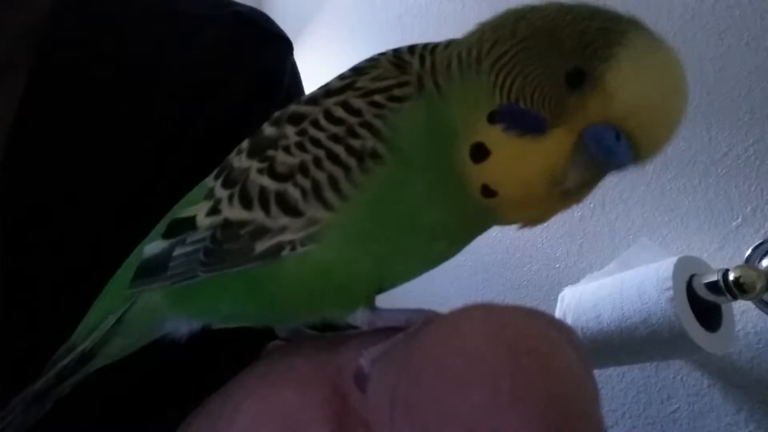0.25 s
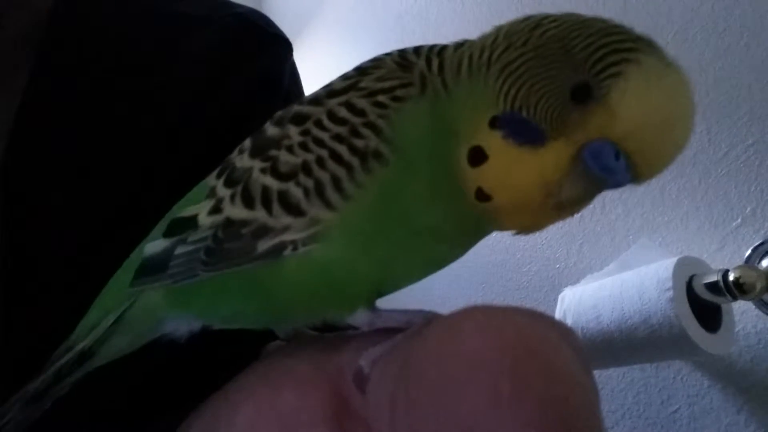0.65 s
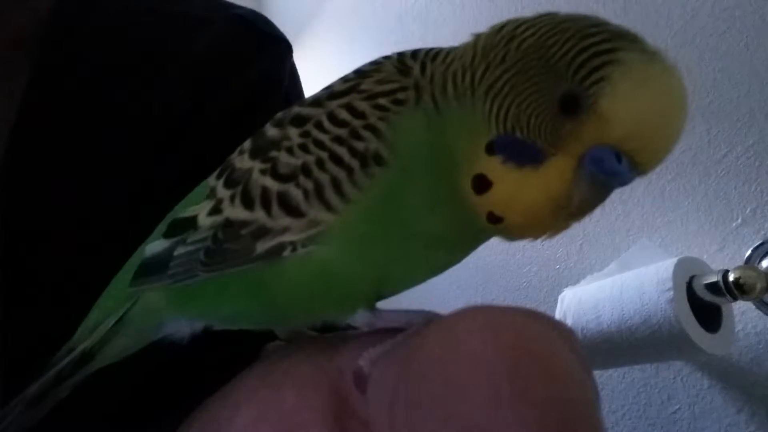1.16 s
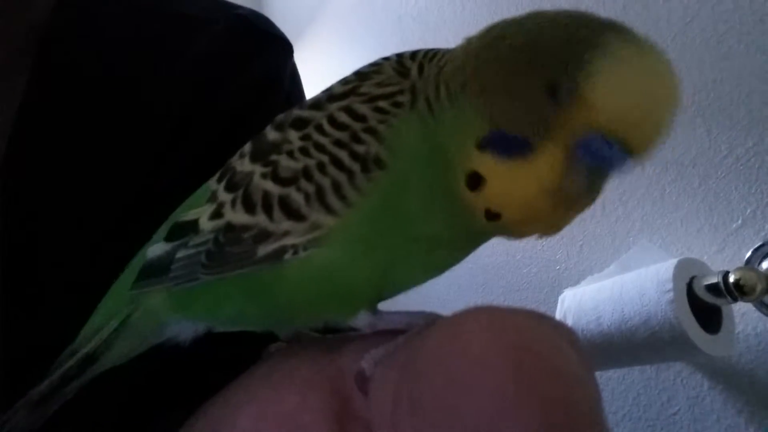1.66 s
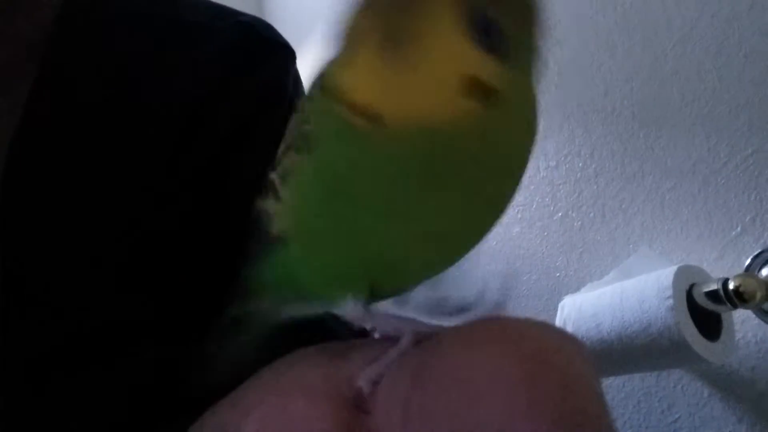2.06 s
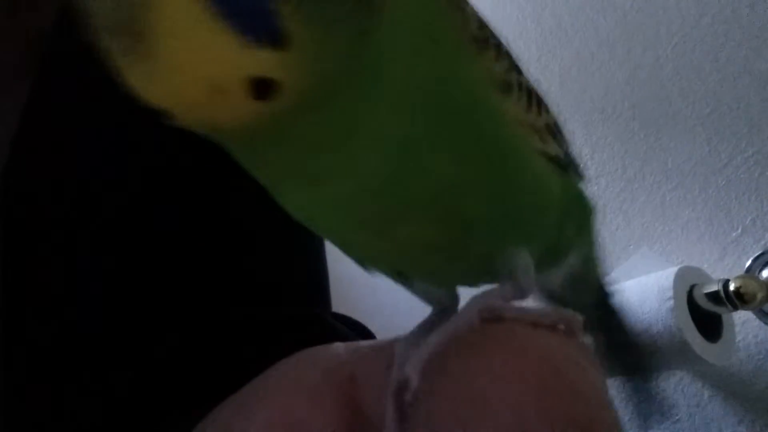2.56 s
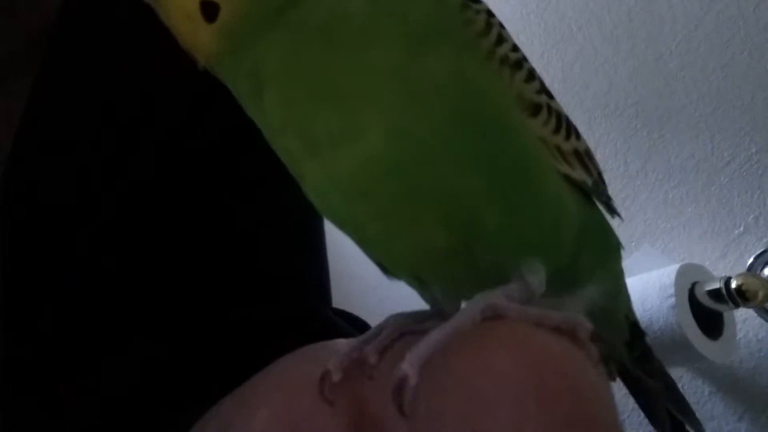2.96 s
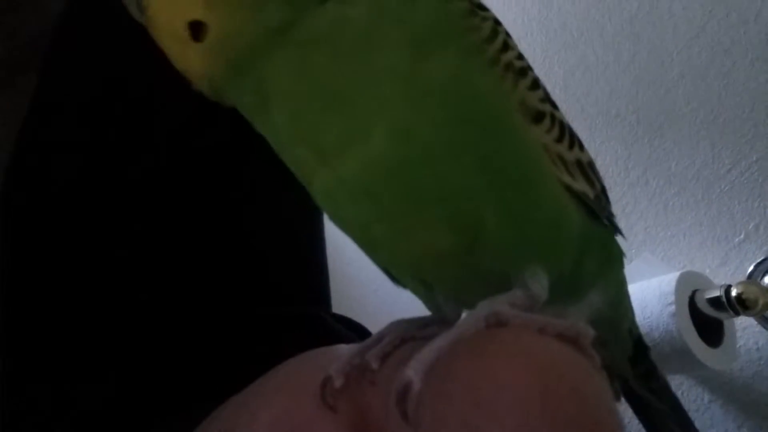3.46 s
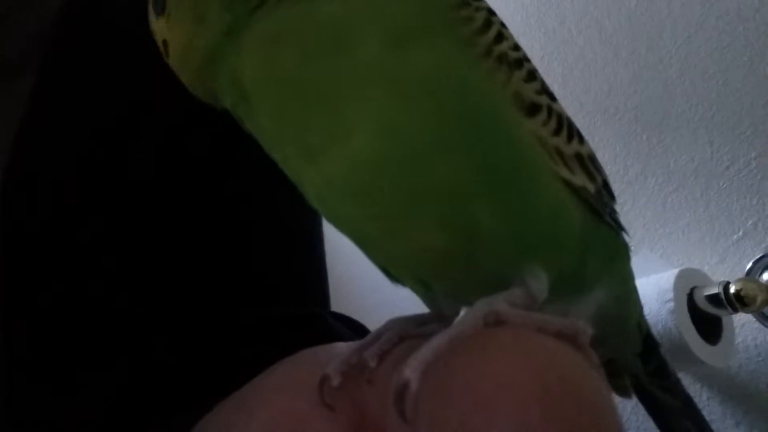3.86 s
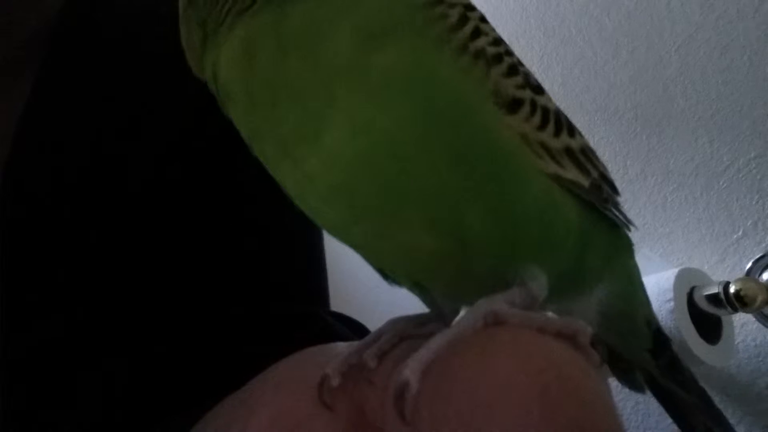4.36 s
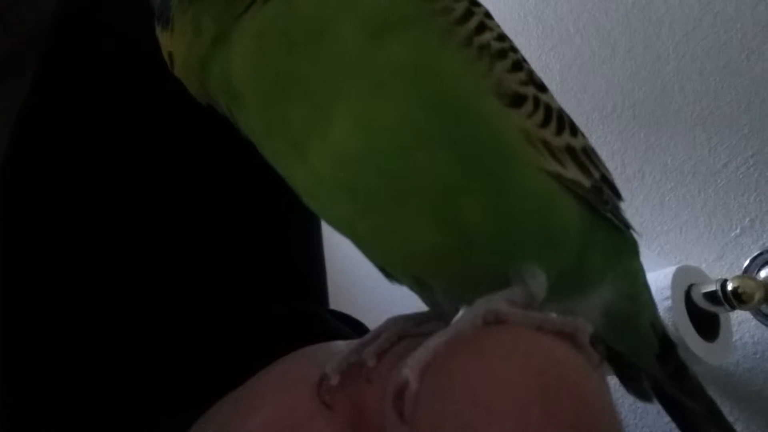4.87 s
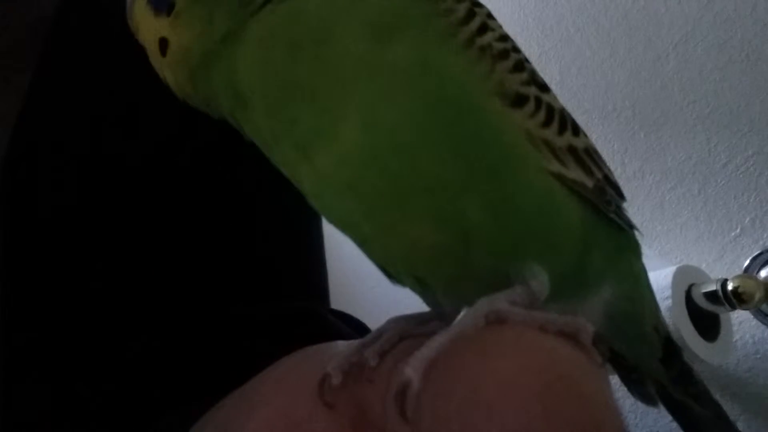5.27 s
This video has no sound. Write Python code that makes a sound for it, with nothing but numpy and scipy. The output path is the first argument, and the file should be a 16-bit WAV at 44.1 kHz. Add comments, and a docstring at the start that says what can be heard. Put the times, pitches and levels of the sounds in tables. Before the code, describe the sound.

A budgerigar very close to the microphone in a small hard-walled room with a steady fan. It starts with faint crackles, beak clicks and throaty clucks, pauses, chirps briefly, then lets out one harsh loud squawk ending in a hard snap. The fan dips and swells back. Later come a sharp click, whistles, a beak rattle and a final hurried warble.

```python
"""A budgerigar chatters on a hand close to the microphone in a small room where a fan runs.
It clucks, crackles, gives one harsh squawk and then warbles in quick runs of gliding whistles.
Slaps and breath noise ring in throat and beak resonances; the whistles are sines with overtones.
The fan is coloured noise with wavering tones. The squawk drives an automatic gain control down,
and the fan swells back afterwards."""
import sys
import numpy as np
from scipy import signal
from scipy.fft import rfft, irfft
from scipy.io import wavfile
from scipy.ndimage import uniform_filter1d, minimum_filter1d

SR = 44100
rng = np.random.default_rng(int(sys.argv[2]) if len(sys.argv) > 2 else 0)


def materialize(psi):
    """Save the field psi as 16-bit PCM at rate SR to the path in sys.argv[1].

    A 1-D psi becomes a single channel; in a 2-D psi each row is a channel.
    """
    bounded = np.clip(np.atleast_2d(psi).T, -1, 1)
    quanta = np.round(bounded * 32767).astype(np.int16)
    wavfile.write(sys.argv[1], SR, quanta)


N = 242991
TIME = np.arange(N) / SR

# All table levels are relative: the mix and the settings beside a table shift them.
# resonances of the throat in the squawk: centre_hz, width_hz, level_db
SQUAWK_THROAT = [(2050, 1100, -1.5), (4470, 700, 2), (5300, 550, 0.5), (6500, 1800, -4.5),
                 (9000, 2200, -10), (13820, 770, -15)]
# resonances of throat and open beak: centre_hz, width_hz, level_db
OPEN_BEAK = [(1670, 660, 3.5), (4430, 2200, 0.5), (5900, 1500, 0), (7900, 610, -3), (10000, 1540, -7),
             (13800, 830, -14)]


def from_db(db):
    """Level to amplitude: 20 dB is a factor of ten."""
    return 10 ** (np.asarray(db) / 20)


def rms_one(x):
    """Normalise to unit mean-square power."""
    return x / np.sqrt(np.mean(x ** 2) + 1e-20)


def at_hz(points, hz):
    """Interpolate a spectrum linearly on a logarithmic frequency axis."""
    known_hz, values = np.transpose(points)
    return np.interp(np.log(np.maximum(hz, 1)), np.log(known_hz), values)


def colour(x, points):
    """Zero-phase filtering: multiply the spectrum by a gain curve in dB."""
    size = x.shape[-1]
    gain = from_db(at_hz(points, np.fft.rfftfreq(size, 1 / SR)))
    return irfft(rfft(x) * gain, size)


def drift(rate_hz):
    """Low-passed noise of unit spread: a random fluctuation up to about the given rate."""
    hz = np.fft.rfftfreq(N, 1 / SR)
    return rms_one(irfft(rfft(rng.standard_normal(N)) / (1 + (hz / rate_hz) ** 4), N))


def resonate(x, modes, low_cut_hz):
    """Parallel resonances of alternating sign; a small throat radiates no bass."""
    out = 0
    for k, (hz, width, db) in enumerate(modes):
        radius = np.exp(-np.pi * width / SR)
        poles = [1, -2 * radius * np.cos(2 * np.pi * hz / SR), radius * radius]
        zeros = np.array([1, 0, -1]) * (1 - radius * radius) / 2
        out = out + (-1) ** k * from_db(db) * signal.lfilter(zeros, poles, x)
    return signal.sosfilt(signal.butter(2, low_cut_hz, "high", fs=SR, output="sos"), out)


def notch(x, hz, width_hz):
    """An antiresonance of the beak cavity removes a narrow band."""
    return signal.lfilter(*signal.iirnotch(hz, hz / width_hz, SR), x)


def gate(start, end, edge_s):
    """Amplitude envelope of one syllable: its samples and a raised-cosine rise and fall."""
    span = np.flatnonzero((TIME > start - edge_s) & (TIME < end + edge_s))
    inside = np.minimum(TIME[span] - start, end - TIME[span])
    return span, np.sin(np.pi / 4 * np.clip(1 + inside / edge_s, 0, 2)) ** 2


def slaps(rate_hz, jitter, spread_db, air):
    """Pulse excitation: uneven slaps of the syrinx membranes with added breath noise."""
    cycles = np.cumsum(rate_hz * np.exp(jitter * drift(rate_hz))) / SR
    strength = from_db(spread_db * np.clip(rng.standard_normal(N), -2, 2))
    pulses = np.diff(np.floor(cycles), prepend=0) * strength
    return rms_one(pulses) + air * rng.standard_normal(N)


def syllables(voice, rows, edge_s):
    """Amplitude gating lets a voice out in short bursts, each at its own level."""
    out = np.zeros(N)
    for start, end, db in rows:
        span, envelope = gate(start, end, edge_s)
        burst = rms_one(voice[span] * envelope)
        out[span] += from_db(db) * burst * np.sqrt(np.mean(envelope ** 2))
    return out


def repeats(start, end, gap_s, db, spread_db, jitter=0.11):
    """A jittered periodic series of strokes: rows of start_s, level_db."""
    times = np.arange(start, end, gap_s)
    late, loud = rng.standard_normal((32, 2))[:len(times)].T
    return [(s + jitter * gap_s * a, db + spread_db * b) for s, a, b in zip(times, late, loud)]


def fan(rush_db=-35.0, tones_db=-1.5, waver_hz_at_500=3.86, waver_db=2.0):
    """Broadband turbulence, partly coherent between channels, with wavering motor and duct tones."""
    # spectrum of the rush: pitch_hz, level_db (per Hz)
    rush_colour = [(18, -35), (30, -8), (71, -15.5), (125, -8), (162, -18.5), (363, -8.5), (402, -11.5),
                   (446, 0), (482, -4.5), (770, -6), (854, -10.5), (1200, -7), (3380, -26.5),
                   (11200, -32.5), (14800, -59.5)]
    # tones of motor and ducts: pitch_hz, level_db
    tone_rows = [(43.1, -51), (118.4, -53), (371.4, -47), (446.8, -43), (549.1, -45), (646.0, -45.5),
                 (759.0, -46.5), (893.6, -55), (995.9, -47.5), (1184, -48.5)]
    # correlation of the two channels: pitch_hz, likeness (-1 to 1)
    likeness = [(60, 1), (300, 0.81), (700, 0.84), (1500, -0.36), (3000, 0), (12000, 0)]
    # right channel over left: pitch_hz, level_db
    lean = [(600, 0), (1400, 5), (2500, 6), (5000, 1), (9000, 0.5)]
    alike = np.clip(at_hz(likeness, np.fft.rfftfreq(N, 1 / SR)), -1, 1)
    mid, side = rfft(rng.standard_normal((2, N)))
    stereo = mid * np.sqrt(1 + alike) + side * np.sqrt(1 - alike) * [[1], [-1]]
    air = colour(irfft(stereo, N), rush_colour)
    air *= from_db(rush_db) / np.std(air.mean(axis=0))
    tones = 0
    for hz, db in tone_rows:
        # the pitch waver grows in proportion to the pitch
        phase = 2 * np.pi * np.cumsum(hz + waver_hz_at_500 * hz / 500 * drift(11.83)) / SR
        tone = np.sin(phase) * from_db(waver_db * drift(4.1))
        tones = tones + from_db(db + tones_db) * rms_one(tone)
    left, right = air + tones
    left = colour(left, [(hz, -db / 2) for hz, db in lean])
    right = colour(right, [(hz, db / 2) for hz, db in lean])
    return np.array([left, right])


def room(x, t60_s=0.35, wet_db=-10.5, first_s=0.0017, left_db=-3.0, early=1.0, early_s=.015,
         wall_hz=4500, treble_s=0.14):
    """Exponentially decaying reverberation from close walls, independent in each channel."""
    # spectrum of the reply: pitch_hz, level_db
    reply_colour = [(500, -4.5), (2500, 1), (5000, 0.5), (9000, 6), (15000, -6)]
    age = TIME[:SR * 3 // 4]
    tail = colour(rng.standard_normal((2, len(age))), reply_colour)
    tail = tail * from_db(-60 * age / t60_s) * (age > first_s)
    dull = signal.sosfilt(signal.butter(1, wall_hz, fs=SR, output="sos"), tail)
    tail = dull + (tail - dull) * np.exp(-age / treble_s)   # every bounce takes away treble
    tail *= 1 + early * np.exp(-age / early_s)   # the nearest walls answer first and loudest
    tail /= np.sqrt(np.sum(tail ** 2, axis=1, keepdims=True))
    reply = signal.fftconvolve(x[None], tail, axes=1)[:, :N]
    return reply * from_db([[wet_db + left_db], [wet_db]])


def steps(thump_hz=110, decay_s=0.0014):
    """Heavily damped oscillations: soft thumps through the hand as the bird shifts its feet."""
    # start_s, level_db (before damping)
    thumps = [(2.804, -7), (2.854, -15), (2.936, -7)]
    out = np.zeros(N)
    for s, db in thumps:
        age = np.maximum(TIME - s, 0)
        decay = np.exp(-np.minimum(age / decay_s, 50))
        out += from_db(db) * np.sin(2 * np.pi * thump_hz * age) * decay
    return out


def crackles(trail_s=0.046, trail_db=-16):
    """Filtered slaps and hiss: a burst through the open beak, then a faint trail."""
    # dry crackles: start_s, length_s, level_db
    crackle_rows = [(0.024, 0.0041, -19.5), (0.327, .019, -38), (0.363, 0.0086, -25.5),
                    (4.512, 0.0124, -21.5), (4.685, 0.041, -28)]
    voice = resonate(slaps(330, jitter=0.48, spread_db=-6, air=1.0), OPEN_BEAK, low_cut_hz=530)
    bursts = [(start, start + length, db) for start, length, db in crackle_rows]
    trails = [(end, end + trail_s, db + trail_db) for _, end, db in bursts]
    return syllables(notch(voice, hz=3100, width_hz=120), bursts + trails, edge_s=0.00087)


def clicks(scrape=0.17, scrape_s=0.0022, rattle_spread_db=3):
    """Impulse response: a snap with a very short scrape rings in the open beak."""
    # single clicks of the beak, the last one ending the rattle: start_s, peak_db
    single = [(0.026, -22), (0.357, -30), (0.7607, -23.5), (3.2047, -10.5), (3.8266, -40), (4.6127, -9.5)]
    # rattles of the beak, quick and then slower: start_s, end_s, gap_s, peak_db
    rattles = [(4.5377, 4.58, .0076, -13), (4.589, 4.606, 0.0097, -13)]
    out, age = np.zeros(N), TIME[:SR // 100]
    rattling = [click for rattle in rattles for click in repeats(*rattle, rattle_spread_db)]
    for s, db in single + rattling:
        impulse = (age == 0) + scrape * rng.standard_normal(len(age)) * np.exp(-age / scrape_s)
        rung = notch(resonate(impulse, OPEN_BEAK, low_cut_hz=340), hz=3000, width_hz=1100)
        at = round(s * SR)
        out[at:at + len(age)] += from_db(db) * rung / np.abs(rung).max()
    return out


def mutters(gap_s=.0095, length_s=0.0058, centre_hz=2720, spread_db=2.5):
    """Soft muttering as a pulse train of tiny clucks: rows start_s, length_s, level_db, centre_hz."""
    # spells of muttering: start_s, end_s, level_db
    spells = [(0.044, 0.073, -31), (0.349, 0.394, -27.5), (0.506, 0.588, -29), (0.623, 0.641, -22.5),
              (1.7, 1.757, -26.5)]
    return [(s, length_s, db, centre_hz) for start, end, level in spells
            for s, db in repeats(start, end, gap_s, level, spread_db)]


def clucks(rest_hz=3000, fade_db=10.5, crack_db=-1.0, crack_s=0.0013, edge_s=.0009):
    """Source and filter: quick slaps ring in the nearly closed throat, tuned anew for each row."""
    # clucks, with a small tick at 0.763 s and a low knock at 3.204 s:
    # start_s, length_s, level_db, centre_hz
    cluck_rows = [(0.357, 0.0026, -18, 2720), (0.5163, 0.0062, -15, 3000), (0.57, 0.0062, -27, 2250),
                  (0.5963, .025, -13.5, 3220), (0.763, 0.0025, -23, 3250), (0.97, 0.0087, -11, 3100),
                  (1.175, 0.011, -24, 3240), (1.18, 0.011, -18, 3020), (1.719, 0.007, -22, 3100),
                  (3.204, 0.003, -26, 1860)]
    # throat resonances when tuned to rest_hz: centre_hz, width_hz, level_db
    rest_throat = [(2750, 1150, 8), (3500, 1560, 2.5), (7860, 1900, -21), (9500, 330, -12),
                   (13800, 1000, -44)]
    out, source = np.zeros(N), slaps(750, jitter=.3, spread_db=0.0, air=0.78)
    open_voice = rms_one(resonate(rng.standard_normal(N), OPEN_BEAK, low_cut_hz=2800))
    for start, length, db, centre_hz in cluck_rows + mutters():
        span, envelope = gate(start, start + length, edge_s)
        throat = [(hz * centre_hz / rest_hz, width, level) for hz, width, level in rest_throat]
        # up to 10 ms of lead-in sets the resonances ringing
        excitation = source[:span[-1] + 1][-len(span) - SR // 100:]
        voice = resonate(excitation, throat, low_cut_hz=900)
        voice = notch(voice, hz=6460, width_hz=730)[-len(span):]
        # the beak parts with a broad crack, then the pressure falls
        age = TIME[span] - TIME[span[0]]
        crack = 2 * from_db(crack_db) * open_voice[span] * np.exp(-age / crack_s)
        fading = rms_one(voice * from_db(-fade_db * age / age[-1]))
        out[span] += from_db(db) * envelope * (fading + crack)
    return out


def snap():
    """Resonant burst: one hard, high snap as the squawk breaks off."""
    # start_s, end_s, level_db
    bursts = [(2.8008, 2.805, 7.5)]
    # resonances of the snap: centre_hz, width_hz, level_db
    modes = [(4500, 640, 8), (5300, 560, 8), (7100, 1600, 1), (9180, 1000, -13.5)]
    voice = resonate(slaps(1100, jitter=0.38, spread_db=-0.5, air=0.244), modes, low_cut_hz=1500)
    return syllables(voice, bursts, edge_s=0.00037)


def squawk(bright_hz=3500):
    """Irregular membrane pulses in a rush of air; treble above bright_hz rises as the beak opens."""
    # start_s, level_db, brightness_db
    squawk_course = [(2.682, -42.5, -5), (2.693, -8, -19), (2.71, -7.5, -15.5), (2.73, -13, -2.5),
                     (2.765, -8.5, -0.5), (2.785, -7, -1), (2.8, -11, -5.5), (2.808, -26, 13)]
    s, db, bright_db = np.transpose(squawk_course)
    voice = resonate(slaps(900, jitter=.5, spread_db=1, air=0.8), SQUAWK_THROAT, low_cut_hz=1500)
    voice = rms_one(notch(voice, hz=3400, width_hz=960))
    dull = signal.sosfiltfilt(signal.butter(2, bright_hz, fs=SR, output="sos"), voice)
    voice = dull + (voice - dull) * from_db(np.interp(TIME, s, bright_db))
    return voice * from_db(np.interp(TIME, s, db)) * (TIME > s[0]) * (TIME < s[-1])


def glide(start, length, first_hz, last_hz, db, sag=.035):
    """Frequency glide that sags by a share in mid-note: rows of start_s, pitch_hz, level_db."""
    along = np.linspace(0, 1, 9)
    pitch = (first_hz + (last_hz - first_hz) * along) * (1 - sag * np.sin(np.pi * along))
    return np.column_stack([start + length * along, pitch, np.full_like(along, db)])


def song(level_whistle_db=19.0, level_overtones_db=-13.0, level_rough=0.094,
         swoop_db=5.0, swoop_overtones_db=-31.0, swoop_rough=.05):
    """Melody by transposing one phrase, plus single notes: (course, overtones_db, roughness)."""
    # the phrase, falling in pitch and growing louder:
    # start_share, length_share, first_hz, last_hz, level_db, overtones_db
    phrase = [(0, 0.205, 4090, 3520, -27.5, -9), (.22, 0.167, 3585, 3400, -25.5, -5),
              (0.428, 0.162, 2940, 2350, -19, -17), (0.602, 0.075, 2595, 2374, -16.5, -28),
              (.74, .07, 1950, 1850, -17, -20), (.85, 0.154, 2025, 1880, -16.5, -26.5)]
    # runs of the phrase:
    # start_s, length_s, pitch_ratio, level_db, swell_db (over the run), overtones_db, roughness (0-1)
    runs = [(3.8694, 0.13, 1.03, -1.5, 1, 2, 0.35), (4.918, 0.096, 1.0, -2.5, 0, 2, 0.26),
            (5.039, .098, 1, -0.5, -2, 1.5, 0.19), (5.166, 0.098, 0.91, -3, 7.5, 0.5, 0.24)]
    # single chips: start_s, length_s, first_hz, last_hz, level_db, overtones_db, roughness (0-1)
    chips = [(1.7303, 0.0059, 3016, 2960, -12.5, -17, 0.15), (1.738, .014, 2974, 2693, -20, -20, 0.44),
             (2.687, .013, 1330, 1550, -20, -26, 0.1), (2.781, 0.033, 2490, 2500, -10, -25, 0.68),
             (3.504, 0.011, 1267, 1280, -20, -11.5, 0.2), (3.52, 0.012, 2600, 2980, -21, 2.5, 0.16),
             (3.838, 0.0084, 4550, 5700, -30, 2, 0.2), (3.85, 0.017, 3000, 1610, -24.5, -19, 0.3),
             (3.994, 0.012, 1498, 1137, -15.5, -9.5, 0.32), (4.007, .01, 1453, 1980, -13, -22, 0.61),
             (4.703, 0.0066, 2440, 1820, -21.5, -1.5, 0.35), (4.725, 0.021, 2220, 2480, -21.5, -14.5, .3),
             (4.749, 0.0059, 1800, 2050, -21, -21, 0.58), (4.885, 0.018, 2810, 1680, -21.5, -24, 0.34),
             (4.905, .005, 4080, 3800, -28, -14, .4), (5.019, 0.011, 3500, 3570, -28, 0.5, 0.2),
             (5.147, 0.017, 4250, 4100, -28, -8, 0.26), (5.171, .014, 2890, 1880, -24.5, -20, 0.46),
             (5.282, 0.004, 3830, 4080, -29, 4, 0.4), (5.29, .013, 3400, 2750, -22.5, -5, 0.2),
             (5.306, 0.011, 2334, 2410, -11.5, -22, 0.1), (5.396, 0.0084, 3330, 3100, -19, -2.5, 0.27),
             (5.417, 0.0037, 2450, 2520, -15.5, -14, 0.14), (5.422, 0.029, 2557, 2225, -25, -20, .4)]
    # drawn-out, nearly level whistle: start_s, pitch_hz, level_db
    level_whistle = [(3.538, 2170, -34), (3.544, 2102, -28.5), (3.556, 2020, -29), (3.562, 1915, -25.5),
                     (3.58, 1855, -28.5), (3.586, 1860, -24.5), (3.625, 1930, -56)]
    # drawn-out swoop: start_s, pitch_hz, level_db
    swoop = [(5.321, 2237, -16.5), (5.335, 1866, -17), (5.353, 1478, -20.5), (5.365, 1352, -25.5),
             (5.375, 1611, -17.5), (5.381, 2170, -18), (5.383, 2350, -18.5), (5.392, 2350, -19.5)]
    notes = []
    for start, length, ratio, run_db, swell_db, run_overtones, rough in runs:
        for at, share, first, last, db, overtones in phrase:
            course = glide(start + at * length, share * length, ratio * first, ratio * last,
                           db + run_db + swell_db * at)
            notes.append((course, overtones + run_overtones, rough))
    notes += [(glide(*course), overtones, rough) for *course, overtones, rough in chips]
    notes.append((np.array(level_whistle) + [0, 0, level_whistle_db], level_overtones_db, level_rough))
    notes.append((np.array(swoop) + [0, 0, swoop_db], swoop_overtones_db, swoop_rough))
    return notes


def whistles(wobble=0.13, flutter_db=10.0, overtone_db=-4.5, rasp_db=-14.0, edge_s=.0015,
             buzz_hz=680, grain_db=5.0):
    """Harmonic synthesis with modulation: gliding notes; roughness adds shake, buzz and rasp."""
    # strength of the overtones by pitch: pitch_hz, level_db
    overtone_strength = [(2500, 8.5), (4000, 0), (5600, -3), (7000, -17), (8300, 0), (9800, -0.5),
                         (11000, -21), (12300, -26), (14000, -8), (16000, -18)]
    out, shake, flutter = np.zeros(N), drift(455), drift(350)
    rasp_source = slaps(600, jitter=0.42, spread_db=-3.5, air=0.53)
    rasp = rms_one(resonate(rasp_source, SQUAWK_THROAT[:-1], low_cut_hz=830))
    # a slower beat of the membranes puts sidebands around the whistle
    buzz = np.sin(2 * np.pi * np.cumsum(buzz_hz * np.exp(.25 * drift(60))) / SR)
    for course, overtones, rough in song():
        s, hz, db = course.T
        span, envelope = gate(s[0], s[-1], edge_s)
        pitch = np.interp(TIME[span], s, hz)
        phase = 2 * np.pi * np.cumsum(pitch * (1 + wobble * rough * shake[span])) / SR
        tone = np.sin(phase)
        for k in range(2, 7):
            partial_db = overtones + overtone_db + at_hz(overtone_strength, k * pitch)
            # each overtone reads another stretch of the flutter
            unsteady_db = grain_db * np.roll(flutter, k * SR // 2)[span]
            tone += from_db(partial_db + unsteady_db) * np.sin(k * phase) * (k * pitch < SR / 2)
        tone = tone * (1 + rough * buzz[span]) + rough * from_db(rasp_db) * rasp[span]
        pressure = from_db(flutter_db * rough * flutter[span])
        level = from_db(np.interp(TIME[span], s, db))
        out[span] += level * envelope * rms_one(tone * pressure)
    return out


def ports(x, shadow, lag_s):
    """Interaural-style cues: the left channel is filtered by a shadow and leads by lag_s."""
    return np.array([colour(np.interp(TIME + lag_s, TIME, x), shadow), x])


def scene():
    """Superposition of the bird's direct sound, the room's reply, the fan and the steps."""
    # left level relative to right, bird on the right: pitch_hz, level_db
    head_shadow = [(700, -12), (1300, -10), (2300, -12), (4300, -10), (8000, -19), (14000, -23)]
    # the same while it clucks, facing sideways: pitch_hz, level_db
    cluck_shadow = [(1200, 0.5), (2300, -13.5), (4300, -3.5), (8000, 7), (10500, 1), (14000, -9)]
    # the same for the squawk, from closer by: pitch_hz, level_db
    squawk_shadow = [(1300, -9), (4300, -9.5), (8000, 1), (14000, -11)]
    warble = whistles()
    clucking = from_db(0.23) * clucks()
    chatter = from_db(-1.5) * crackles() + from_db(4.0) * clicks()
    harsh = from_db(-1.0) * squawk() + snap()
    direct = ports(warble + chatter, head_shadow, lag_s=.00009)
    direct = direct + ports(clucking, cluck_shadow, lag_s=.00008)
    direct = direct + ports(harsh, squawk_shadow, lag_s=0.000212)
    reply = room(warble + chatter + from_db(-1.5) * clucking + harsh)
    return direct + reply + fan() + steps()


def gain_control(x, threshold_db=-20.5, sense_hz=4500, window_s=0.071, hold_s=0.65,
                 release_db_per_s=36.0, attack_s=0.02):
    """Compression: sustained loud treble pulls the gain down; it holds, then recovers slowly."""
    treble = signal.sosfilt(signal.butter(2, sense_hz, "high", fs=SR, output="sos"), x[1])
    power = uniform_filter1d(treble ** 2, int(window_s * SR))
    excess_db = np.maximum(10 * np.log10(np.maximum(power, 1e-12)) - threshold_db, 0)
    hold = int(hold_s * SR) // 2
    # running maximum over the past hold time
    held_db = -minimum_filter1d(-excess_db, 2 * hold + 1, origin=hold, mode="constant")
    release_db = release_db_per_s * TIME
    cut_db = np.maximum.accumulate(held_db + release_db) - release_db
    smooth = np.exp(-1 / (attack_s * SR))
    return x * from_db(-signal.lfilter([1 - smooth], [1, -smooth], cut_db))


def record(dry):
    """Band limiting and saturation: rumble filter, gain control, clipping and a steep top cut."""
    rumble_cut = signal.butter(6, 36, "high", fs=SR, output="sos")
    top_cut = signal.ellip(10, .2, 80, 14800, fs=SR, output="sos")
    controlled = gain_control(signal.sosfilt(rumble_cut, dry))
    return signal.sosfilt(top_cut, np.clip(controlled, -1, 1))


dry = scene()
out = record(dry)
materialize(out)
```